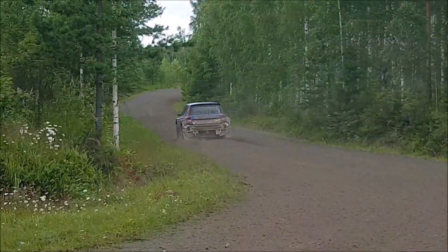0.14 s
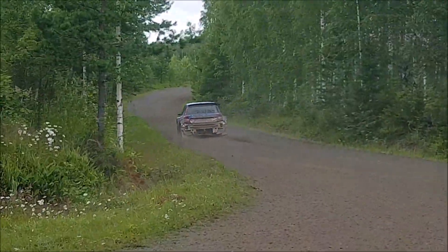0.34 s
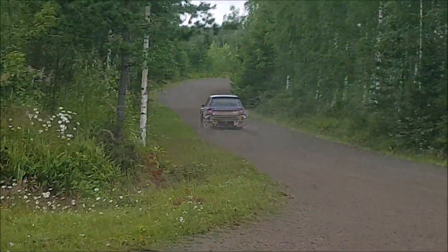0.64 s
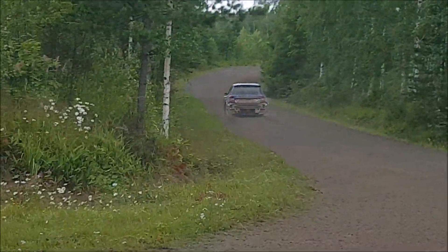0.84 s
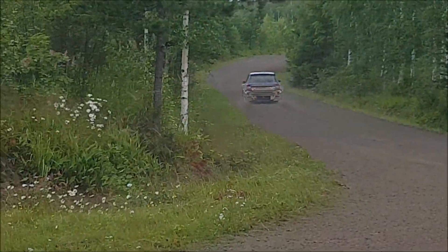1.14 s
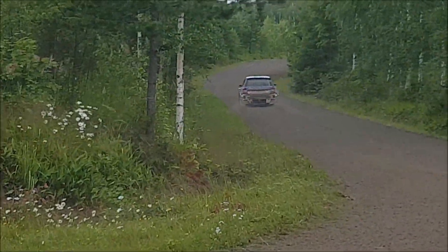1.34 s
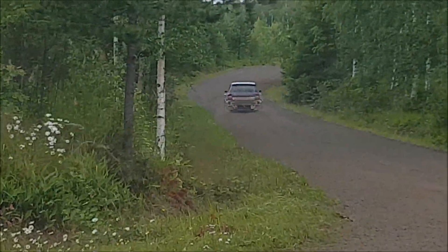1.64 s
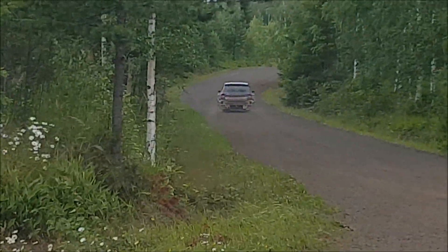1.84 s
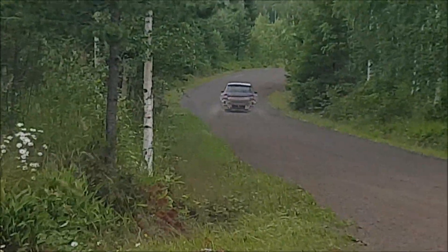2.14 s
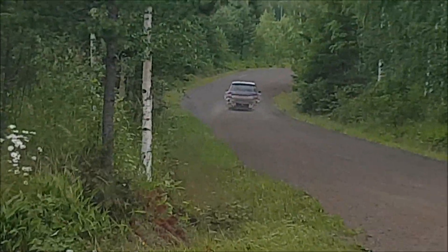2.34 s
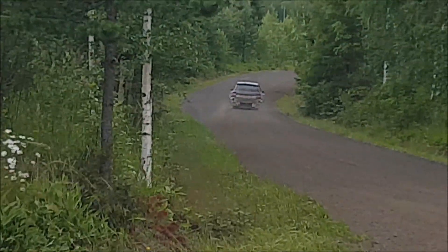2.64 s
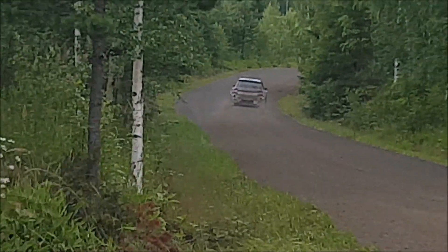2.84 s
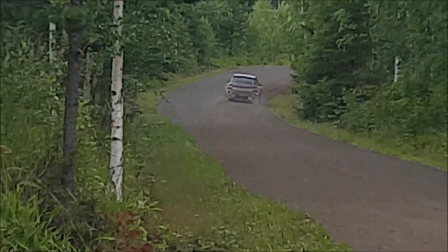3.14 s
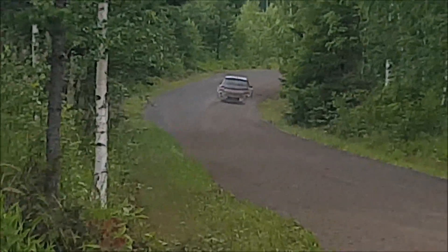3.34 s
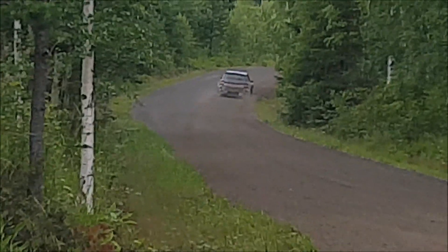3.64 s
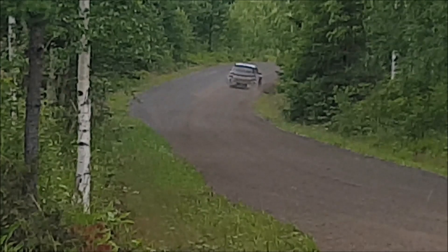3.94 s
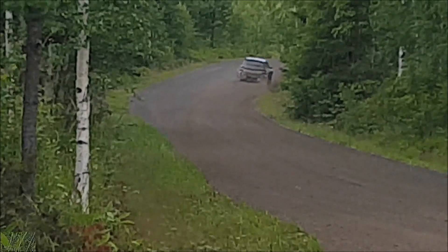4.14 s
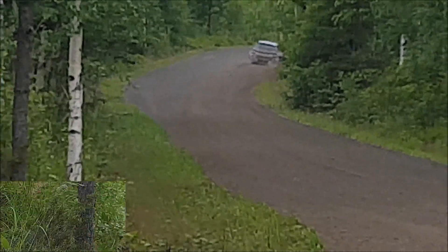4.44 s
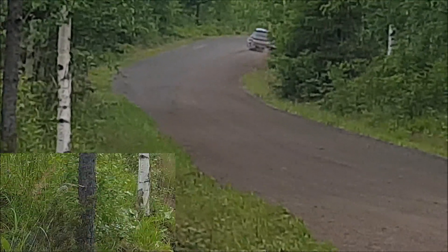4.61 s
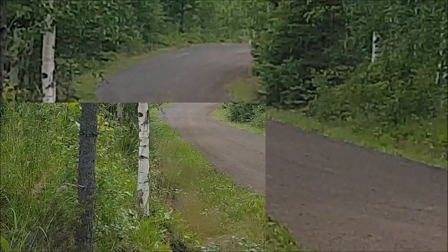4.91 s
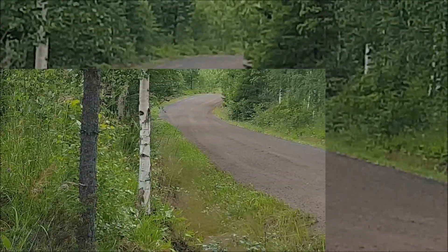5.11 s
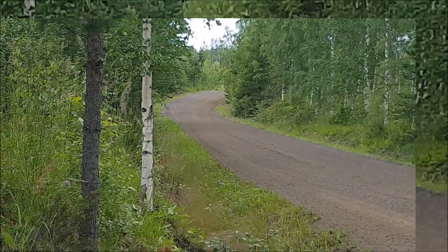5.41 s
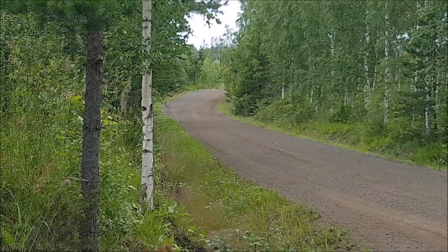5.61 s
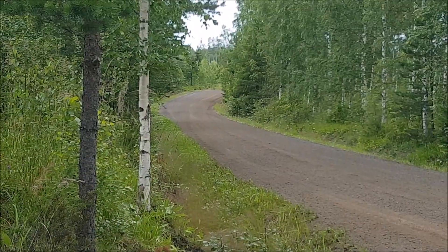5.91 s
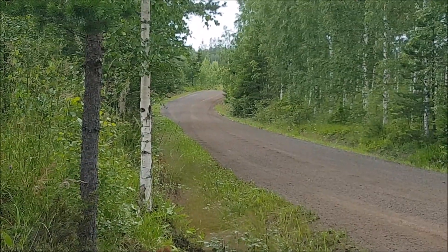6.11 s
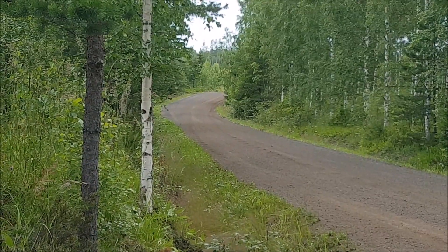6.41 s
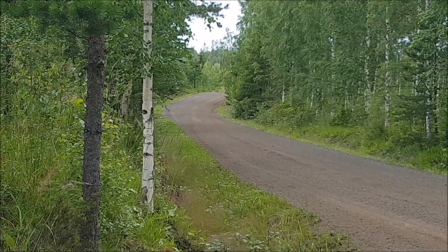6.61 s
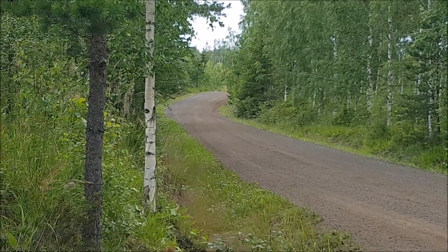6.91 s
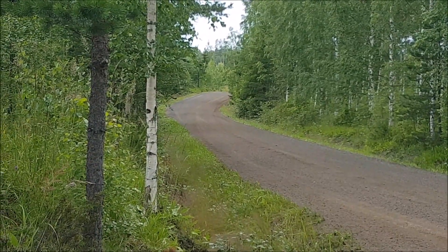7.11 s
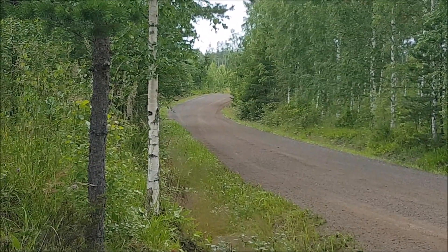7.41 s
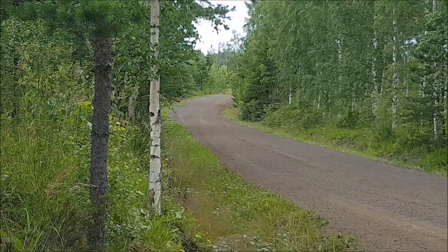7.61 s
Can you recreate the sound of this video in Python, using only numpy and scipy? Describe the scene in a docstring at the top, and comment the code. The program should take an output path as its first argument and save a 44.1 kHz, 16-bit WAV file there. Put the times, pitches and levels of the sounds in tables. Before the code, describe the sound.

Close roadside microphone with low air buffeting: a booming, raspy rally car leaves on the right, changing up almost at once and again a couple of seconds later with exhaust pops. Gravel hiss and trunk echoes fade behind it. A sudden edit drops to faint, wide forest ambience, where far engines hum and another car approaches with swelling tyre hiss, a fluttering whine and a thin sinking whistle.

```python
"""A turbocharged four-cylinder rally car pulls away up a forest gravel road, almost wholly on the right.
Swept firing harmonics and gas noise ring through exhaust resonances; upshifts add bangs, tyres spray noise grains.
A hard cut leads to the empty road: one far engine drones in a few harmonics over diffuse roar,
while another car approaches with a rising rush of tyre noise, a whine and a thin, sinking whistle."""
import sys
import numpy as np
from scipy import signal
from scipy.fft import rfft, irfft, next_fast_len
from scipy.io import wavfile
from scipy.ndimage import uniform_filter1d

SR = 44100
rng = np.random.default_rng(int(sys.argv[2]) if len(sys.argv) > 2 else 0)


def put_to_file(sound):
    """Save the sound as 16-bit audio at rate SR, in the file named by the first command-line argument."""
    columns = np.atleast_2d(sound).T  # one column per channel
    safe = np.clip(columns, -1, 1)
    whole_steps = np.round(safe * 32767)
    wavfile.write(sys.argv[1], SR, whole_steps.astype(np.int16))


N = 342201
T = np.arange(N) / SR  # time [s]
CUT_S = 5.537  # hard cut from the leaving car to the empty road
TOP_HZ = 15800  # nothing is kept above this

# One pull in each gear: (start [s], end [s], firing rate from [Hz], to [Hz], boom from [dB], to [dB])
GEAR_PULLS = [(0, 0.37, 182, 193.6, -13, -11.5), (.46, 2.5, 143.6, 184.4, -15, -16),
              (2.6, 5.48, 143.6, 171.8, -20, -24.5)]
# Ignition cuts for the shifts: (start [s], end [s], level [dB])
IGNITION_CUTS = [(0.395, 0.417, -9), (0.461, 0.499, -5), (2.516, 2.608, -4.5), (5.511, 5.565, -1.5)]
# How the pipe passes firing harmonics 2 and 3 as they sweep through it: (frequency [Hz], level [dB])
PIPE_RESPONSE = [(290, -25.7), (320, -27), (345, -29.5), (380, -29.5), (440, -34.5), (475, -35), (510, -39),
                 (543, -49), (580, -45)]
# Lines between the harmonics from unequal cylinders: (multiple of firing rate, level against harmonic 2 [dB])
UNEVEN_CYLINDERS = [(1.25, -18.5), (1.5, -11.5), (1.751, -27.5), (2.25, -24), (2.5, -23.5), (2.749, -32.5)]
# Growl resonances of the exhaust: (centre [Hz], width [Hz], relative level [dB])
GROWL_MODES = [(709, 100, 3), (770, 25, 5.5), (910, 210, -10.5), (1008, 110, -3)]
# Growl swelling where a harmonic meets a pipe resonance: (firing rate [Hz], level [dB])
GROWL_BY_REVS = [(143, -46), (152, -41.5), (163, -41.5), (170, -38.5), (177, -38), (185, -44.5), (191, -36),
                 (194, -43)]
# Rasp resonances of the exhaust: (centre [Hz], width [Hz], relative level [dB])
RASP_MODES = [(1249, 130, 5), (1374, 60, 0), (1840, 120, -18), (2460, 360, -26.5)]
# Rasp through the two long gears, one list for each: (time [s], level [dB])
RASP_LEVELS = [
    [(0.53, -47), (1.088, -36), (1.34, -42), (1.728, -36), (2.2, -38.5), (2.212, -39), (2.46, -36)],
    [(2.63, -36), (3.07, -35.5), (3.39, -28.5), (3.84, -36.5), (3.95, -33.5), (5.29, -45), (5.46, -42.5)],
]
# Outline of the low turbulent gas in the pipe: (frequency [Hz], relative level [dB])
GAS_LOW_OUTLINE = [(40, -41.5), (90, -19.5), (130, 2.5), (190, 5.5), (270, -0.5), (340, 4), (400, -2),
                   (480, -2), (580, -7.5), (1000, -63), (4000, -80.5)]
# Outline of the high turbulent gas in the pipe: (frequency [Hz], relative level [dB])
GAS_HIGH_OUTLINE = [(400, -32), (600, -2.5), (750, 1.5), (900, -5), (1100, 0), (1300, 5), (1430, 3),
                    (1570, -12.5), (1860, -2), (2150, -11.5), (2550, -9), (2850, -25.5), (4500, -25.5),
                    (8000, -57)]
# Band weakened by the bounce off the road, moving as the car climbs away: (time [s], centre [Hz])
GROUND_NOTCH = [(0, 920), (3.3, 859), (3.7, 733), (5.5, 699.5)]
# Outline of the gravel thrown by the tyres: (frequency [Hz], relative level [dB])
GRAVEL_OUTLINE = [(300, -4.5), (700, 4), (1500, -3.5), (1900, 5.5), (2200, -0.5), (2550, 2.5), (2780, -0.5),
                  (3100, -0.5), (5100, -3.5), (6000, -13.5), (6600, -15), (8300, -30.5), (10000, -36.5),
                  (15000, -33.5)]
# Extra gravel as the wheels spin up after a shift: (time of peak [s], length [s], gain [dB])
WHEEL_SPINS = [(1.099, 0.5, 2.5), (2.811, 0.14, 4.5)]
# Single stones striking the underbody: (time [s], relative level [dB], ring [Hz])
STONE_STRIKES = [(.439, -30, 4000), (.456, -28, 4539), (.975, -38, 4340), (1.436, -30, 4740),
                 (1.456, -37, 4200), (1.496, -34.5, 5000), (1.714, -30.5, 4600), (1.848, -33, 4308),
                 (2.156, -38.5, 5380), (2.740, -30.5, 2600), (3.158, -43, 4300), (4.253, -38.5, 4752),
                 (4.293, -43, 5195), (4.992, -44.5, 4540)]
# Bangs in the exhaust; the last row is a short thump chopped off by the hard cut:
# (time [s], relative thump level [dB], relative crack level [dB])
EXHAUST_BANGS = [(0.401, -15, -37.5), (.438, -21.5, -22.5), (.450, -17, -32.5), (.458, -16, -29.5),
                 (.472, -12.5, -33.5), (0.485, -18.5, -30.5), (2.496, -19.5, -25), (2.525, -20, -19),
                 (2.549, -15, -21), (2.572, -16, -29), (2.583, -16.5, -26.5), (5.491, -21.5, -22),
                 (5.5344, -19, -33)]
# Low pipe modes rung by a bang: (frequency [Hz], 60 dB decay [s], relative level [dB])
THUMP_MODES = [(150.7, 0.11, 4), (254, 0.081, 3.5), (339, 0.023, -16.5)]
# Crack of a bang after the pipe: (frequency [Hz], relative level [dB])
CRACK_OUTLINE = [(400, -19), (1000, -11.5), (1320, 6), (1650, -11), (2400, -10.5), (3300, -27),
                 (5200, -29.5), (8000, -55.5), (14000, -62)]
# Colour of the longest path through the forest: (frequency [Hz], gain [dB])
FOREST_PATH = [(400, -0.5), (1300, -0.5), (1580, 0.5), (1850, 1.5), (2500, 1.5), (2900, 0), (3600, 2),
               (4600, -1.5), (6000, -3.5), (9000, -10)]
# How much of the car reaches the left side: (frequency [Hz], gain [dB])
LEFT_SHADE = [(60, -4.5), (170, -20.5), (280, -22), (470, -41.5), (780, -33.5), (1300, -37.5), (6000, -50)]
# Outline of the air buffeting the microphone: (frequency [Hz], relative level [dB])
BUFFET_OUTLINE = [(15, -12), (30, -1.5), (65, 4), (100, 4.5), (170, -8), (400, -19.5), (1500, -52.5),
                  (6000, -86)]
# Engine of the approaching car: (time [s], firing rate [Hz], reference level of the overtones [dB])
COMING_ENGINE = [(5.54, 269, -48), (5.82, 281, -50), (6.04, 268, -43.5), (6.45, 268, -57.5),
                 (6.8, 272, -46.5), (7.08, 272, -42.5), (7.42, 260, -52), (7.58, 253, -54),
                 (7.76, 249, -67)]
# Outline of the low rumble on the empty road: (frequency [Hz], relative level [dB])
RUMBLE_OUTLINE = [(20, -27), (50, -12.5), (100, -2), (160, -1.5), (220, 0), (330, -11), (600, -20),
                  (2000, -71)]
# Outline of the diffuse forest roar: (frequency [Hz], relative level [dB])
ROAR_OUTLINE = [(250, -29), (350, -10), (430, -1), (600, 2), (750, -6), (900, -6.5), (1060, -2.5),
                (1270, -11.5), (1850, -13), (2100, -19.5), (2850, -22), (3400, -26.5), (4200, -76)]
# Outline of the rush of the nearing tyres: (frequency [Hz], relative level [dB])
RUSH_OUTLINE = [(1000, 10.5), (2000, 8), (2750, 8.5), (3500, 6), (4400, -0.5), (5500, -6.5), (7500, -13),
                (9000, -31), (15000, -23)]

PULL_S = 2.15  # time constant with which the revs level off in a gear
# a small random pitch wander, growing with time, blurs the harmonics as the car recedes
WANDER_HZ, WANDER_PER_S = .7, 14  # spread reached at the cut, and steps a second
LOPE_DB, LOPE_FROM_HZ, LOPE_DB_PER_HZ = -34, 180, 0.87  # every other firing is stronger near the rev limit
BEND_S, BEND_DB_PER_S = 4.14, -3.5  # the car rounds the bend and the trees begin to screen it
SPRAY_DB, SPRAY_DB_PER_S = -40, -2.5  # tyre spray at the start, fading as the car leaves
WAKE_DB, WAKE_FALL_DB, WAKE_S = -33.5, -16.5, 5.36  # stirred air settles: start level, fall and its time
GUST_S, GUST_LENGTH_S, GUST_DB = 4.47, .06, 11  # one late gust
FAR_HZ, FAR_HZ_PER_S, FAR_DB, FAR_UPPER_DB = 196.2, 2.7, -47, -56  # far engine: climb from the cut, levels
FAR_DIP_S, FAR_DIP_LENGTH_S, FAR_DIP_DB = 6.56, 0.2, -13  # its first harmonic sinks for a moment
COMING_BOOM_DB, COMING_BOOM_RISE_DB = -58, 9  # nearing engine's first harmonic: far off, and gain at full nearness
NEAR_S, APPROACH_S = 7.79, 0.41  # nearness grows exponentially, reaching 1 at NEAR_S
ROAR_DB, ROAR_FALL_DB = -46, -6.5  # the diffuse roar gives way
RUSH_DB, RUSH_RISE_DB = -64, 11.5  # to the rush of the tyres
SWISH_S, SWISH_ATTACK_S, SWISH_DB = 7.32, 0.27, -60  # a narrow hiss just before the whine
WHINE_S, WHINE_ATTACK_S, WHINE_DB, WHINE_HZ, WHINE_SAG_HZ = 7.47, 0.24, -52, 2290, 135
WHISTLE_S, WHISTLE_ATTACK_S, WHISTLE_DB, WHISTLE_HZ, WHISTLE_SAG_HZ = 6.9, .15, -87, 6170, 1000


def undb(db):
    """Decibels to gain."""
    return 10 ** (np.asarray(db) / 20)


def unit(x):
    """Scale to rms 1."""
    return x / np.sqrt(np.mean(x ** 2))


def curves(rows):
    """The columns of a table, joined by straight lines in time."""
    s, *columns = np.transpose(rows)
    return [np.interp(T, s, c) for c in columns]


def colour(x, points):
    """Filter by a (frequency [Hz], gain [dB]) outline, interpolated on a log frequency axis."""
    hz, db = np.transpose(points)
    size = next_fast_len(N + 4096)
    f = np.arange(size // 2 + 1) * SR / size
    gain = undb(np.interp(np.log(f + 1), np.log(hz), db))
    return irfft(rfft(x, size) * gain, size)[:N]


def noise(points, grain=1):
    """Noise of rms 1 with a given outline; grain shapes it in time before the filter."""
    return unit(colour(rng.standard_normal(N) * grain, points))


def spread(points, width):
    """Stereo noise with a shared centre and a given share of side."""
    sides = np.array([[1], [-1]])
    return noise(points) + width * sides * noise(points)


def walk(rate):
    """Smooth random wander with a spread near 1, stepping rate times a second."""
    k = max(int(SR / rate), 1)
    steps = np.repeat(rng.standard_normal(N // k + 1), k)[:N]
    return 1.38 * uniform_filter1d(uniform_filter1d(steps, k), k)


def turn(hz):
    """Running phase in radians."""
    return 2 * np.pi * np.cumsum(hz) / SR


def line(phase, flutter, rate):
    """A partial of rms near 1 whose strength and phase flutter."""
    in_phase = (1 + flutter * walk(rate)) * np.sin(phase)
    quadrature = flutter * walk(rate) * np.cos(phase)
    return np.sqrt(2 / (1 + 2 * flutter ** 2)) * (in_phase + quadrature)


def add(out, s, sound):
    """Mix a short sound in at time s."""
    i = int(s * SR)
    out[i:i + len(sound)] += sound[:N - i]


def fade(t, t60):
    """Exponential decay by 60 dB in t60 seconds."""
    return np.exp(-np.log(1000) * t / t60)


def hump(s, length):
    """A smooth bump of height 1 around time s."""
    return np.exp(-((T - s) / length) ** 2)


def swell_in(s, attack):
    """A gain that grows from time s and then holds at 1."""
    return np.clip((T - s) / attack, 0, 1) ** 2.5


def pulls():
    """Firing rate and boom level: the revs climb ever more slowly in each gear and drop across the shift."""
    rows = []
    for start, end, from_hz, to_hz, from_db, to_db in GEAR_PULLS:
        s = np.linspace(start, end, 40)
        gained = np.expm1(-(s - start) / PULL_S) / np.expm1(-(end - start) / PULL_S)
        hz = from_hz + (to_hz - from_hz) * gained
        boom_db = from_db + (to_db - from_db) * gained
        rows += zip(s, hz, boom_db)
    return curves(rows)


def screened_db():
    """What the trees take away once the car is in the bend."""
    return BEND_DB_PER_S * np.maximum(T - BEND_S, 0)


def pipe(hz, phase, modes, half_db, notch_hz, notch_width_hz=110):
    """Engine orders swell in the resonances and sink in the ground notch; the sum keeps rms near 1."""
    out, power = 0, 0
    centres = [m[0] for m in modes]
    lowest, highest = min(centres) - modes[0][1], max(centres) + modes[-1][1]
    for order in range(7, 32):  # in halves of the firing rate
        k = order / 2
        f = k * hz[::64]  # gains move slowly, so one value every 64 samples will do
        if f.max() < lowest or f.min() > highest:
            continue
        gain = sum(undb(db) / (1 + (2 * (f - centre) / width) ** 2) for centre, width, db in modes)
        gain *= 1 - .7 / (1 + ((f - notch_hz[::64]) / notch_width_hz) ** 2)
        gain = np.repeat(gain, 64)[:N] * undb(half_db * (order % 2))  # half_db weakens the half orders
        out = out + gain * line(k * phase + rng.uniform(0, 2 * np.pi), flutter=.17, rate=45)
        power = power + gain ** 2
    return out / np.sqrt(power)


def exhaust():
    """Firings boom in the low harmonics and rasp in the upper resonances; gas puffs out once a firing."""
    hz, first_db = pulls()
    notch_hz, = curves(GROUND_NOTCH)
    lope_db = LOPE_DB + LOPE_DB_PER_HZ * np.maximum(hz - LOPE_FROM_HZ, 0)
    pipe_hz, pipe_db = np.transpose(PIPE_RESPONSE)
    second_db = np.interp(2 * hz, pipe_hz, pipe_db) + screened_db()
    third_db = np.interp(3 * hz, pipe_hz, pipe_db) + screened_db()
    growl_db = np.interp(hz, *np.transpose(GROWL_BY_REVS))
    rasp_db, = curves(np.vstack(RASP_LEVELS))

    # the crank runs slightly unevenly; the harmonics line up into one pulse a firing
    wander_hz = WANDER_HZ * T / CUT_S * walk(WANDER_PER_S)
    phase = turn(hz + wander_hz) + 0.038 * walk(40)
    boom = undb(first_db) * line(phase, flutter=0.04, rate=45)
    boom += undb(first_db + lope_db) * line(phase / 2, flutter=.3, rate=23)
    boom += undb(second_db - .5) * line(2 * phase + np.pi / 2, flutter=0.099, rate=46)
    boom -= undb(third_db - 0.4) * line(3 * phase, flutter=0.22, rate=40)
    uneven = sum(undb(db) * line(k * phase, flutter=0.36, rate=20) for k, db in UNEVEN_CYLINDERS)
    boom += undb(second_db + 0.2) * uneven

    growl = undb(growl_db - 3.5) * pipe(hz, phase, GROWL_MODES, half_db=-10.5, notch_hz=notch_hz)
    rasp_gain = undb(rasp_db - 0.66 + 1.1 * walk(18))
    rasp = rasp_gain * pipe(hz, phase, RASP_MODES, half_db=-11, notch_hz=notch_hz)

    puffs = 1 + 0.46 * np.sin(phase)
    gas_high_db = growl_db + 0.52 * (rasp_db - growl_db) - 2.5  # follows both growl and rasp
    gas = undb(second_db - 9) * noise(GAS_LOW_OUTLINE, puffs)
    gas += undb(gas_high_db) * noise(GAS_HIGH_OUTLINE, puffs)

    ignition_db = sum(db * ((T > start) & (T < end)) for start, end, db in IGNITION_CUTS)
    ignition = uniform_filter1d(uniform_filter1d(undb(ignition_db), size=200), size=200)
    return boom * ignition, (growl + rasp) * ignition + gas


def gravel():
    """A dense spray of grit, with single stones ticking against the car."""
    spray_db = SPRAY_DB + SPRAY_DB_PER_S * T + 0.67 * screened_db()
    spray_db += sum(db * hump(s, length) for s, length, db in WHEEL_SPINS)
    sizes = np.minimum(rng.exponential(size=N // 40 + 1), 4)  # a new grain every 40 samples
    grains = undb(2.2 * np.repeat(sizes, 40)[:N])
    spray = undb(spray_db + 0.99 * walk(25)) * noise(GRAVEL_OUTLINE, grains)

    t = T[:SR // 20]
    ticks = np.zeros(N)  # each stone is a short decay of ringing noise
    for s, db, hz in STONE_STRIKES:
        band = signal.butter(2, [.7 * hz, 1.21 * hz], "band", fs=SR, output="sos")
        ring = unit(signal.sosfilt(band, rng.standard_normal(len(t))))
        add(ticks, s, undb(db) * ring * fade(t, t60=0.038))
    return spray + undb(-4.0) * colour(ticks, [(5500, -1.0), (9000, -11)])


def bangs():
    """Each bang swells into the low pipe modes and cracks through the upper ones."""
    t = T[:SR // 5]
    swell = 1 - np.exp(-(t / 0.0024) ** 2)
    modes = sum(undb(db) * np.sin(2 * np.pi * hz * t) * fade(t, t60) for hz, t60, db in THUMP_MODES)
    ring = swell * modes
    thumps, bursts = np.zeros(N), np.zeros(N)
    for s, thump_db, crack_db in EXHAUST_BANGS:
        add(thumps, s - .004, undb(thump_db) * ring)  # starts early to make room for the swell
        add(bursts, s, undb(crack_db) * fade(t, t60=0.066))
    thumps = colour(thumps, [(40, -8.5), (110, -0.5), (400, 2.5), (1200, -25.5)])
    cracks = undb(11.5) * colour(bursts * rng.standard_normal(N), CRACK_OUTLINE)
    return thumps, cracks


def forest(x, t60):
    """Diffuse scatter from the tree trunks: a noise tail that builds up, then decays."""
    t = T[:SR]
    tail = rng.standard_normal(SR) * fade(t, t60) * (1 - np.exp(-t / 0.026))
    return signal.fftconvolve(x, tail / np.sqrt(np.sum(tail ** 2)))[:N]


def buffeting():
    """Air stirred by the car buffets both sides in shared eddies and settles, save for one late gust."""
    air_db = WAKE_DB + WAKE_FALL_DB * (T / WAKE_S) ** 2 + GUST_DB * hump(GUST_S, GUST_LENGTH_S)
    eddies = undb(air_db + 3 * walk(16))
    return np.array([undb(db) * eddies * noise(BUFFET_OUTLINE) for db in (-2, -6)])


def leaving_car():
    """The near car on the right, a trace of it and its forest echo on the left, air on both sides."""
    boom, bark = exhaust()
    thumps, cracks = bangs()
    bright = bark + cracks + gravel()
    # air and foliage take more of the treble as the car gets further away
    away = np.minimum(T / CUT_S, 1)
    bright = (1 - away) * bright + away * colour(bright, FOREST_PATH)
    right = undb(6.0) * (boom + thumps + bright) + undb(-3.0) * forest(bright + thumps, t60=1.0)

    echo_outline = [(100, -17.0), (170, -14.5), (480, 2), (1000, -2.5), (2000, -3.5), (6000, -14.5)]
    echo = forest(colour(right, echo_outline), t60=0.91)
    # the left is shaded and hears the car two samples later
    shaded = np.roll(colour(right, LEFT_SHADE), 2)
    # the echo gains on the direct sound as the car gets further away
    left = shaded + undb(-33 + 3.2 * T) * echo
    return np.array([left, right]) + buffeting()


def faint_hiss():
    """A wide, steady bed of soft treble noise."""
    return undb(-75.0) * spread([(1000, 0.5), (9000, -1.0), (14000, 3.5)], width=.9)


def distant_engine(hz, first_db, upper_db, overtones, flutter):
    """A few fluttering harmonics, scattered by the trees; overtones: (multiple, level against upper_db [dB])."""
    phase = turn(hz)
    upper = sum(undb(db) * line(k * phase, flutter, rate=18) for k, db in overtones)
    return undb(first_db) * line(phase, flutter, rate=12) + undb(upper_db) * upper


def far_engines(near):
    """One engine drones and climbs slowly; the approaching one gains boom with nearness."""
    far_hz = FAR_HZ + FAR_HZ_PER_S * (T - CUT_S)
    far_db = FAR_DB + FAR_DIP_DB * hump(FAR_DIP_S, FAR_DIP_LENGTH_S)
    far_overtones = [(2, 0.0), (3, -10.0), (5, -22)]
    far = distant_engine(far_hz, far_db, FAR_UPPER_DB, far_overtones, flutter=0.57)

    coming_hz, upper_db = curves(COMING_ENGINE)
    boom_db = COMING_BOOM_DB + COMING_BOOM_RISE_DB * near
    coming_overtones = [(2, 0.5), (3, -15.5), (4, -21), (4.5, -18.0), (5, -18.5)]
    return far + distant_engine(coming_hz, boom_db, upper_db, coming_overtones, flutter=0.34)


def whistle_and_whine(near):
    """Two fluttering tones of the nearing car, both sagging in pitch; the whine also has an octave."""
    whistle_gain = undb(WHISTLE_DB + 4 * walk(8)) * swell_in(WHISTLE_S, WHISTLE_ATTACK_S)
    whistle = whistle_gain * line(turn(WHISTLE_HZ - WHISTLE_SAG_HZ * near), flutter=.6, rate=70)
    phase = turn((WHINE_HZ - WHINE_SAG_HZ * near) * (1 + 0.016 * walk(300)))
    tone = line(phase, flutter=0.7, rate=110) + undb(-18) * line(2 * phase, flutter=.7, rate=90)
    return whistle + undb(WHINE_DB) * swell_in(WHINE_S, WHINE_ATTACK_S) * tone


def empty_road():
    """Two far engines over the forest's diffuse roar; tyres and whine grow as a car nears."""
    near = np.exp((T - NEAR_S) / APPROACH_S)
    roar_db = ROAR_DB + ROAR_FALL_DB * near
    rush_db = RUSH_DB + RUSH_RISE_DB * near
    rumble_db = 0.38 * rush_db - 25.82 + 1.5 * walk(4.24)
    rumble = undb(rumble_db) * spread(RUMBLE_OUTLINE, width=0.098)
    roar = undb(roar_db + walk(12)) * spread(ROAR_OUTLINE, width=0.59)
    rush = undb(rush_db) * spread(RUSH_OUTLINE, width=0.79)
    swish_outline = [(2200, -26), (2600, -2), (2800, 1), (3200, -25), (6000, -50)]
    swish = undb(SWISH_DB) * swell_in(SWISH_S, SWISH_ATTACK_S) * spread(swish_outline, width=.5)
    balance = undb([[-1], [.8]])  # left, right: leans slightly to the right
    return far_engines(near) + rumble + (roar + rush + swish + whistle_and_whine(near)) * balance


def scene():
    """The near car, then a hard cut to the empty road; faint hiss throughout."""
    return np.where(T < CUT_S, leaving_car(), empty_road()) + faint_hiss()


def record(dry):
    """Softly round the highest peaks, then cut the top with a steep low-pass."""
    rounded = dry / (1 + (dry / .95) ** 8) ** (1 / 8)
    return signal.sosfilt(signal.ellip(8, .2, 70, TOP_HZ, fs=SR, output="sos"), rounded)


dry = scene()
out = record(dry)
put_to_file(out)
```